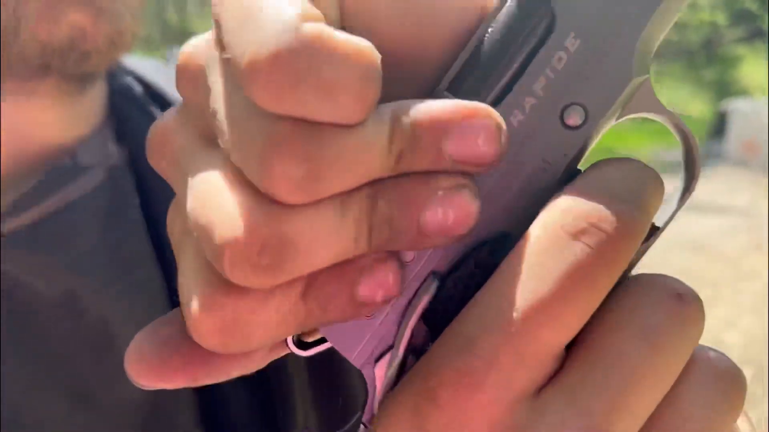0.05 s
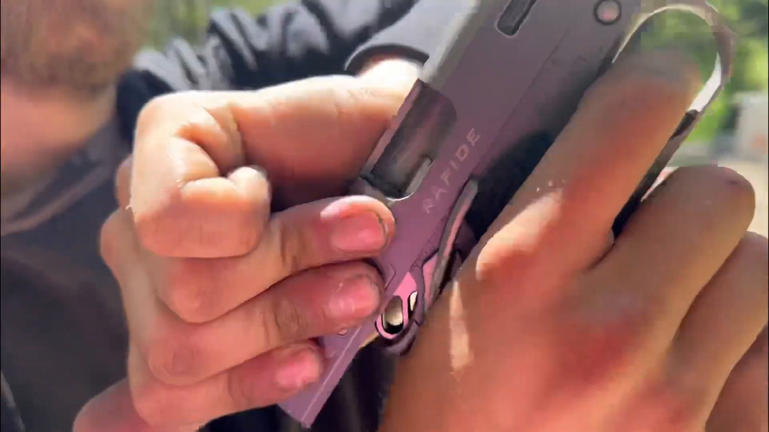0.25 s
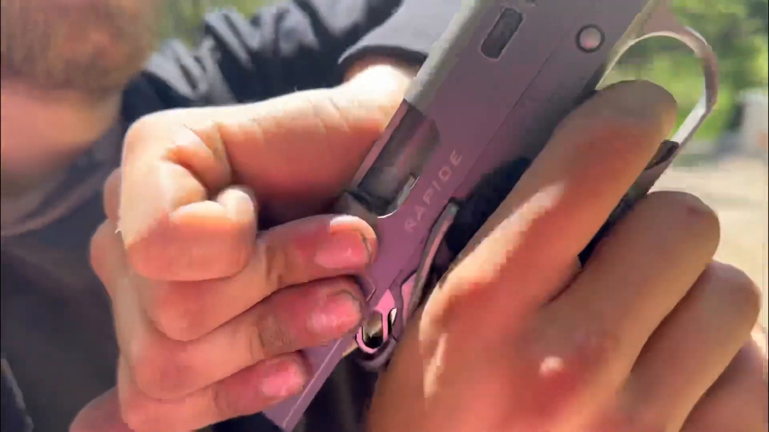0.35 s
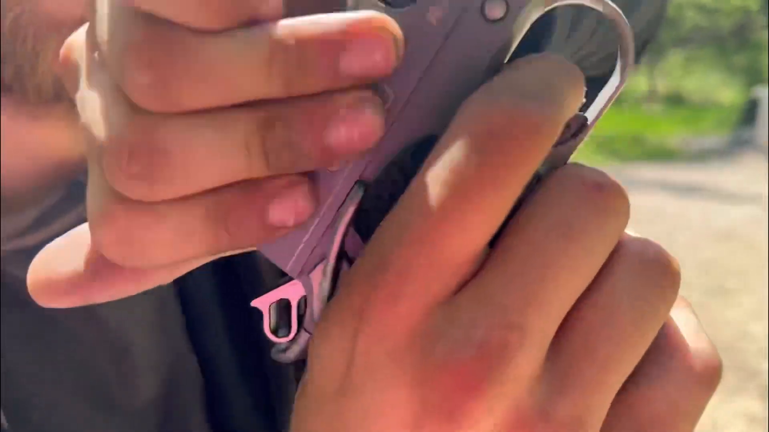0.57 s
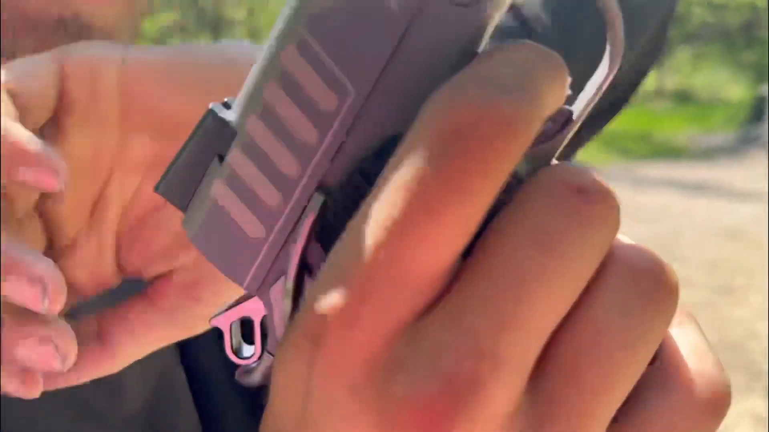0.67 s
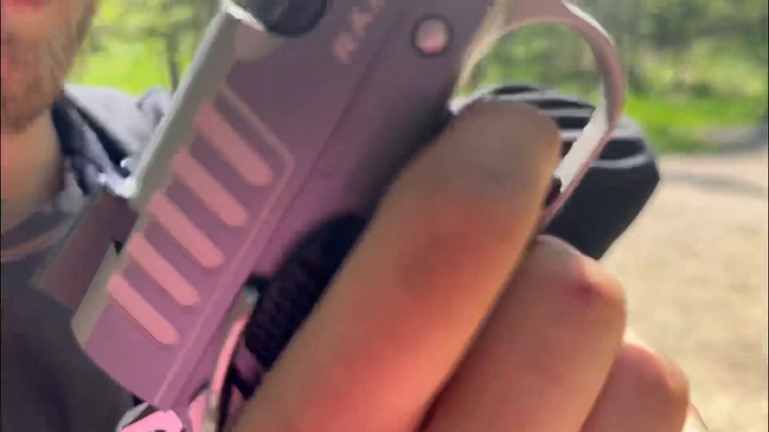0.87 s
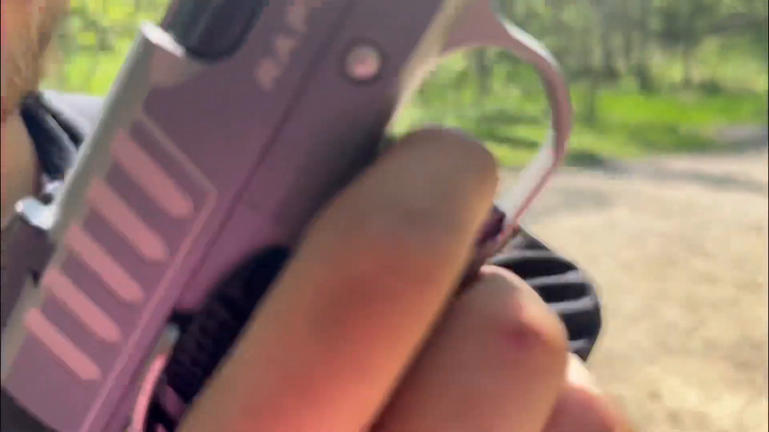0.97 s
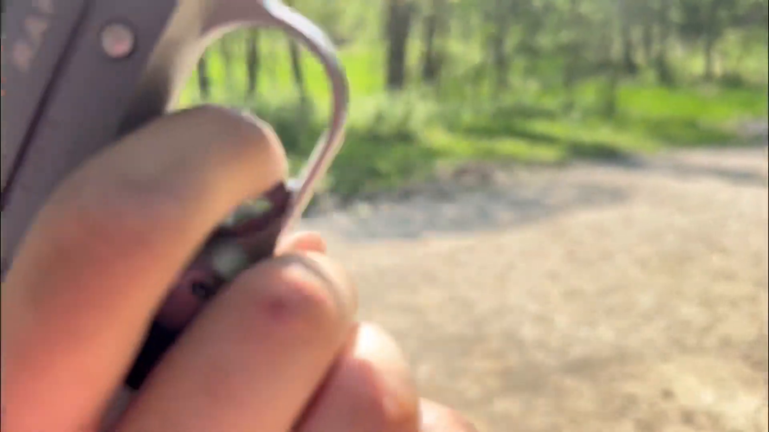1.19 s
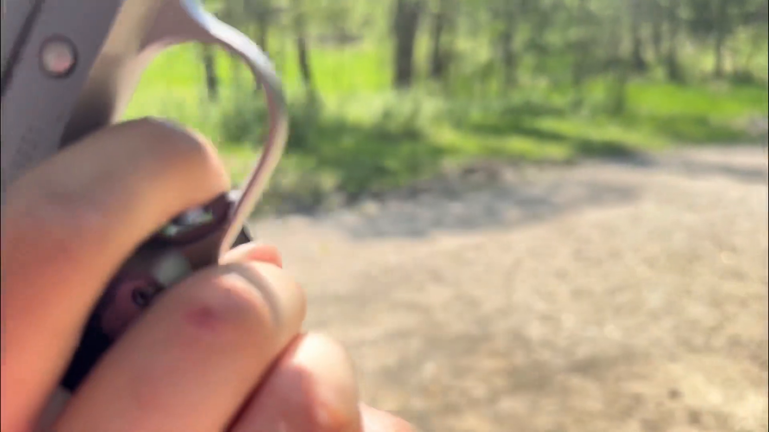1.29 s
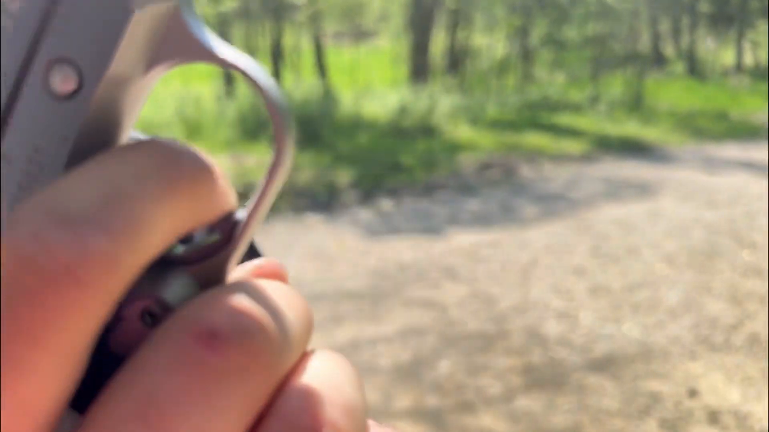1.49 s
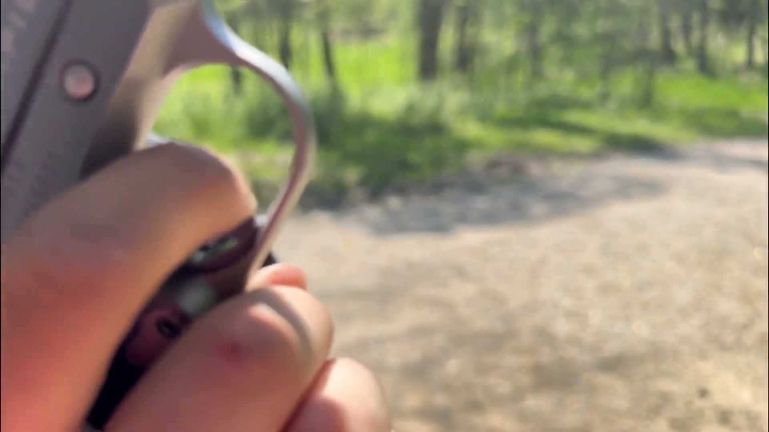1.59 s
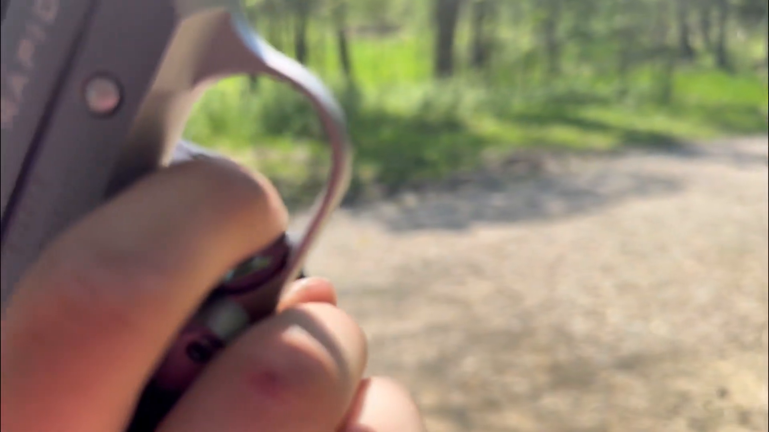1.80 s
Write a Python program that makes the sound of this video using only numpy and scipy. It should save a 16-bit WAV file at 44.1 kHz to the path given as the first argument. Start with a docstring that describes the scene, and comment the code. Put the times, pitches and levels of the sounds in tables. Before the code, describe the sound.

A pistol is racked close to the microphone: the hammer clicks back, the slide scrapes open with a thump, then rides forward and snaps shut. Hands shift softly on the grip over faint outdoor air and distant birds.

```python
"""Racking a pistol slide

An unloaded steel pistol is worked by hand close to the microphone, outdoors: the hammer clicks back,
the slide scrapes to its rear stop with a thump, rides forward and snaps shut.
Then the hands shift on the grip, over faint air and distant birds."""
import sys
import numpy as np
from scipy import signal
from scipy.fft import rfft, irfft, next_fast_len
from scipy.io import wavfile
from scipy.ndimage import map_coordinates

SR = 44100
rng = np.random.default_rng(int(sys.argv[2]) if len(sys.argv) > 2 else 0)


def dump_mix(stems):
    """Bounce the given channels to the path in sys.argv[1] as a 16-bit WAV at rate SR."""
    frames = np.atleast_2d(stems).T  # one column per channel
    limited = np.clip(frames, -1, 1)  # hard clip at full scale
    pcm = np.round(limited * 32767).astype(np.int16)
    wavfile.write(sys.argv[1], SR, pcm)


N = 81585
TOP_HZ = 16500

# colour of the pistol's steel: f/Hz, level/dB
STEEL_COLOUR = [(150, -48), (550, -28.5), (800, -19), (1050, -8.5), (1400, -8), (1800, -6), (2500, -11),
                (3600, -4.5), (5000, -9), (6000, -13), (7500, -9.5), (9200, -4.5), (11000, -13),
                (13500, -19.5), (15200, -20), (17000, -31.5)]
# echo decay among the trees: f/Hz, t60/s
WOODS_DECAY = [(200, 0.27), (3000, 1.1), (9000, 0.24), (15000, .5)]


def amp(db):
    """Decibels to gain."""
    return 10 ** (np.asarray(db) / 20)


def unit(x):
    """Scale to rms 1."""
    return x / np.sqrt(np.mean(x ** 2) + 1e-20)


def along(points, hz):
    """Interpolate (f/Hz, value) points on a log axis."""
    point_hz, values = np.transpose(points)
    return np.interp(np.log(hz + 1), np.log(point_hz + 1), values)


def clock():
    """Sample times in s."""
    return np.arange(N) / SR


def wobble(knots_per_s):
    """Smooth random curve."""
    knots = rng.standard_normal(int(N * knots_per_s / SR) + 4)
    return map_coordinates(knots, [clock() * knots_per_s])


def filtered(x, response):
    """Apply a complex frequency response."""
    size = next_fast_len(N + SR // 4)
    return irfft(rfft(x, size) * response(np.fft.rfftfreq(size, 1 / SR)), size)[..., :N]


def burst(t60_s, rise_s=0.0004):
    """Decaying noise of energy 1."""
    t = np.arange(SR // 10) / SR
    x = rng.standard_normal(len(t)) * amp(-60 * t / t60_s) * (1 - np.exp(-t / rise_s))
    return x / np.linalg.norm(x)


def add(out, at_s, x, response, size=16384):
    """Colour the short sound x and mix it into out."""
    lead = size // 4
    start = round(at_s * SR) - lead
    spectrum = rfft(np.pad(x, (lead, 0)), size)
    coloured = irfft(spectrum * response(np.fft.rfftfreq(size, 1 / SR) + 1))
    a, b = max(start, 0), min(start + size, N)
    out[a:b] += coloured[a - start:b - start]


def stereo(mid, side):
    """Mid and side to left and right."""
    return np.array([mid + side, mid - side])


def ring(at_s, modes, rise_s=0.0007):
    """Damped modes after a blow."""
    t = np.maximum(clock() - at_s, 0)
    tones = sum(amp(db - 60 * t / t60_s) * np.sin(2 * np.pi * hz * t) for hz, db, t60_s in modes)
    return (1 - np.exp(-t / rise_s)) * tones


def glides(rows, waver):
    """Unsteady tones that glide and settle on a note."""
    out = np.zeros(N)
    for at_s, length_s, start_hz, end_hz, db in rows:
        progress = np.clip((clock() - at_s) / length_s, 0, 1)
        hz = (end_hz + (start_hz - end_hz) * (1 - progress) ** 2) * (1 + waver * wobble(200))
        arch = 2 * np.sqrt(progress * (1 - progress))
        out += amp(db) * arch * np.sin(2 * np.pi * np.cumsum(hz) / SR)
    return out


def noise(colour, levels, width, waver_db):
    """Stereo noise wavering about a level curve."""
    mid, side = unit(filtered(rng.standard_normal((2, N)), lambda hz: amp(along(colour, hz))))
    gain = amp(np.interp(clock(), *np.transpose(levels)) + waver_db * wobble(8.4))
    return gain * stereo(mid, width * side)


def echo(x, decay, width=0.72):
    """Diffuse stereo tail; each frequency dies at its own rate."""
    hz, t, spectra = signal.stft(rng.standard_normal((2, SR)), SR, nperseg=256)
    fade = amp(-60 * t / along(decay, hz)[:, None])
    _, tail = signal.istft(spectra * fade, SR, nperseg=256)
    mid, side = signal.fftconvolve(x[None], tail / np.linalg.norm(tail[0]), axes=1)[:, :N]
    return stereo(mid, width * side)


def air():
    """Faint, wide outdoor hush."""
    colour = [(59, -30), (100, 0), (502, -4.5), (854, -14), (1360, -12.5), (1800, -17.5), (2420, -18.5),
              (3860, -25.5), (4770, -23), (7610, -33.5), (10000, -36), (14700, -41), (16000, -53)]  # f/Hz, level/dB
    levels = [(0, -72.5), (.5, -69), (.8, -66.5), (1.05, -65.5), (1.42, -66), (1.6, -68), (1.85, -72)]  # t/s, level/dB
    return noise(colour, levels, width=0.78, waver_db=-2)


def birds():
    """Far whistles echoing in the trees."""
    whistles = [(1.09, 0.045, 1410, 1420, -70.5), (1.203, 0.059, 6490, 6850, -74.5),
                (1.281, 0.052, 7800, 5150, -69), (1.466, 0.029, 6430, 5100, -77),
                (1.53, .05, 4200, 4420, -71.5), (1.591, .085, 4578, 4650, -67),
                (1.701, 0.051, 4746, 4620, -75.5), (1.78, 0.069, 3376, 3100, -77.5),
                (1.795, .06, 5250, 5180, -74.5), (1.808, 0.065, 5972, 6300, -68.5)]  # t/s, length/s, start f/Hz, end f/Hz, level/dB
    song = glides(whistles, waver=0.006)
    return song + echo(song, WOODS_DECAY)


def handling_rumble():
    """Deep, nearly centred noise from the hands."""
    colour = [(20, -21), (35, -5.5), (60, 9), (90, 1), (140, -8), (300, -40)]  # f/Hz, level/dB
    levels = [(0, -68), (.6, -64), (0.921, -67), (1.5, -69), (1.85, -65.5)]  # t/s, level/dB
    return noise(colour, levels, width=0.12, waver_db=4)


def surroundings(gun):
    """Reflections of the pistol: a short echo and a longer one from the trees."""
    colour = [(100, -22.5), (1000, -28), (2500, -16), (5000, -20), (9000, -25), (15000, -23.5)]  # f/Hz, gain/dB
    short_decay = [(150, .2), (1000, 0.42), (3000, 0.12), (9000, 0.33), (15000, 0.071)]  # f/Hz, t60/s
    sent = filtered(gun, lambda hz: amp(along(colour, hz)))
    return echo(sent, short_decay) + amp(-10) * echo(sent, WOODS_DECAY)


def skin_squeaks():
    """Skin squeaks on the grip in short, unsteady tones."""
    squeaks = [(.865, 0.022, 1400, 900, -59), (1.358, 0.044, 1841, 1863, -56.5),
               (1.415, 0.0343, 1445, 747, -59)]  # t/s, length/s, start f/Hz, end f/Hz, level/dB
    return glides(squeaks, waver=0.0428)


def soft_knocks():
    """Soft knocks, each with a brighter tick: mostly the hands knocking and rubbing on the grip, but at 0.2615
    s and 0.479 s the mid-band body of the slide's thumps at its rear stop and as it shuts."""
    taps = [(.1262, -24.5, 480, 0.016, -41.5), (.1778, -18, 490, 0.014, -43.5),
            (.2615, 1.5, 580, 0.015, -30.5), (.3700, -37.5, 715, .012, -28.5),
            (.4790, 0, 600, 0.011, -32.5), (.5950, -22.5, 1197, 0.01174, -31.5),
            (0.6502, -11.5, 950, 0.012, -46.5), (0.66, -18, 1200, 0.013, -45),
            (0.6778, -21.5, 1152, 0.0073, -48.5), (1.015, -15.5, 447, 0.023, -32.5),
            (1.076, -18, 413.5, .03, -32), (1.2184, -14, 456, 0.014, -27), (1.2790, -15.5, 550, 0.028, -28),
            (1.3235, -16.5, 943, 0.0066, -60), (1.362, -10.5, 461, 0.085, -23.5),
            (1.3810, -26.5, 1786, 0.042, -27), (1.388, -14, 595, 0.035, -23),
            (1.4390, -19.5, 700.5, 0.066, -31.5), (1.7336, -29.5, 603, 0.0068, -33.5)]  # t/s, knock level/dB, centre f/Hz, t60/s, tick level/dB
    skin_colour = [(200, -6.5), (2000, 1), (3600, -8), (5500, -5.5), (9000, -16.5), (15000, -27.5)]  # f/Hz, level/dB
    q = 2
    out = np.zeros(N)
    for at_s, knock_db, centre_hz, t60_s, tick_db in taps:
        add(out, at_s, burst(t60_s), lambda hz: amp(knock_db) / (1 + (q * np.log(hz / centre_hz)) ** 4))
        add(out, at_s, burst(t60_s), lambda hz: amp(tick_db + along(skin_colour, hz)))
    return out


def thumps():
    """Dull jolts through the hands, each leaving a faint deep boom."""
    jolts = [(0.243, 7.5, 152.7), (0.262, 19, 287.6), (0.264, 28.5, 115), (.3040, 9, 260),
             (0.41, -3, 264.6), (.4370, -0.5, 278), (.4785, 1.5, 450), (0.501, -5.5, 202), (1.159, 9.5, 65),
             (1.726, 4, 55)]  # t/s, level/dB, low-pass f/Hz
    low_cut_hz = 51
    boom_hz, boom_gain_db, boom_t60_s = 43.56, -70.5, 1.0
    out = np.zeros(N)
    for at_s, db, corner_hz in jolts:
        band = lambda hz: 1 / np.sqrt((1 + (hz / corner_hz) ** 6) * (1 + (low_cut_hz / hz) ** 4))
        add(out, at_s, [amp(db)], band)
        out += ring(at_s, [(boom_hz, db + boom_gain_db, boom_t60_s)])
    return out


def slide_scrape():
    """The slide grates along its rails; close steel resonances ripple the spectrum."""
    strokes = [(0.194, 0.202, -53.5, -50.5, -1.5), (0.236, 0.242, -36.5, -32.5, -0.5),
               (0.239, 0.259, -28.5, -27, 5), (.392, .410, -56, -48.5, 2.5),
               (0.405, 0.435, -44.5, -40.5, 0.5), (0.442, 0.482, -35.5, -34, -1)]  # start t/s, end t/s, start level/dB, end level/dB, tilt/(dB/octave)
    rough_db, fade_s = 2, 0.0018
    ripple_db, ripple_step_hz = 5, 70.87
    out, t = np.zeros(N), clock()
    for start_s, end_s, start_db, end_db, tilt in strokes:
        colour = lambda hz: amp(along(STEEL_COLOUR, hz) + tilt * np.log2((hz + 1) / 4000))
        grit = rng.standard_normal(N) * amp(rough_db * wobble(640))
        gate = np.clip(np.minimum(t - start_s, end_s - t) / fade_s + 0.5, 0, 1)
        gain = amp(np.interp(t, [start_s, end_s], [start_db, end_db]))
        out += unit(filtered(grit, colour)) * gate * gain
    knots = rng.standard_normal(2000)
    ripple = lambda hz: map_coordinates(knots, [hz / ripple_step_hz], mode="wrap")
    return filtered(out, lambda hz: unit(amp(ripple_db * ripple(hz))))


def steel_ring():
    """Steel rings on as the hammer is pushed back and the slide hits each stop."""
    hammer_modes = [(935, -22.5, 0.015), (1087, -22, .02), (1690, -28, .02), (3260, -26, .014),
                    (3950, -25.5, 0.01), (4680, -26.5, .014), (7900, -27, 0.012)]  # f/Hz, level/dB, t60/s
    hammer_blows = [(.2076, 3), (0.2226, -4)]  # t/s, gain/dB
    open_modes = [(1130, -36.5, .05), (1992, -34, .09), (2902, -42.5, .15), (3790, -29, 0.033),
                  (5170, -36, .15), (7278, -43, .13), (9500, -36, .1), (10437, -42, .1)]  # slide held open: f/Hz, level/dB, t60/s
    shut_modes = [(2084, -20.5, 0.032), (2300, -38.5, 0.053), (2430, -33, 0.08), (2682, -32, .06),
                  (3310, -33, 0.041), (4770, -56.5, 0.14), (7806, -48.5, .12)]  # action closed: f/Hz, level/dB, t60/s
    open_s, shut_s, low_cut_hz = 0.2612, 0.4788, 700
    hammer = sum(amp(db) * ring(at_s, hammer_modes) for at_s, db in hammer_blows)
    slide = ring(open_s, open_modes) + ring(shut_s, shut_modes)
    return signal.sosfilt(signal.butter(6, low_cut_hz, "high", fs=SR, output="sos"), hammer + slide)


def steel_clicks(width=0.55):
    """Mid and side: sharp strikes, smeared by the steel, with chatter unlike at the two mic ports."""
    contacts = [(0.1029, -26.5, -30, -37, -22, 0.013), (.1180, -17, -21, -27, -16, 0.017),
                (0.126, -16.5, -28, -32.5, -13.5, 0.011), (0.1712, -19, -16, -17, -14.5, 0.018),
                (0.1769, -4, -16, -19, -8.5, 0.039), (0.2069, 10.5, 13, 20, 24.5, 0.0058),
                (0.2181, 5, 17, 9.5, 15.5, 0.025), (0.2216, 12, 16, 16, 16.5, .007),
                (0.2445, 1.5, 10.5, 3.5, 14, 0.022), (0.2432, 3.5, 8, 4, 8.5, 0.027),
                (0.2612, 20, 13.5, 16, 20.5, 0.0086), (0.2623, -16, 21, 9, 10.5, 0.013),
                (.2740, -8.5, 7, 1.5, 3, 0.05), (0.2848, -1.5, 0.5, -3, 3, .015),
                (0.4, -24, -24, -12, -4, 0.008), (0.4107, -13.5, -13, -5.5, -0.5, .012),
                (.4380, 1.5, -2.5, 7, 13, 0.0051), (0.4485, -3.5, -16, 11.5, 17.5, 0.0082),
                (.4580, -15, -5.5, 2.5, 3.5, 0.0074), (0.4661, 3.5, 8.5, 18.5, 16, 0.0082),
                (0.4781, 10, 17, 15.5, 13.5, .007), (0.608, -26, -35.5, -23.5, -23.5, .02),
                (0.6244, -13.5, -29, -27.5, -16, 0.012)]  # t/s, level/dB at each of bands_hz, chatter t60/s
    bands_hz = [1000, 4000, 9000, 14000]  # f/Hz
    strike_db, chatter_db, spread_s = -3.5, -2, 0.00025
    mid, side = np.zeros((2, N))
    for at_s, *band_db, t60_s in contacts:
        bands = list(zip(bands_hz, band_db))
        colour = lambda hz: amp(along(STEEL_COLOUR, hz) + along(bands, hz))
        delays_s = spread_s * rng.standard_normal(16)
        group_delay_s = lambda hz: np.interp(hz, np.linspace(0, TOP_HZ, len(delays_s)), delays_s)
        smear = lambda hz: np.exp(-2j * np.pi * np.cumsum(group_delay_s(hz)) * (hz[1] - hz[0]))
        add(mid, at_s, [amp(strike_db)], lambda hz: colour(hz) * smear(hz))
        add(mid, at_s, amp(chatter_db) * burst(t60_s), colour)
        add(side, at_s, width * amp(chatter_db) * burst(t60_s), colour)
    return mid, side


def mic_ports(x):
    """Level and phase between the two ports place the sound slightly left."""
    balance = [(100, 1), (280, 1), (600, 2.5), (1100, 4), (2200, -0.5), (3500, 1.5), (5500, 8.5), (7500, 4),
               (9200, -0.5), (15000, 2.5)]  # f/Hz, left minus right/dB
    phase = [(120, 0), (300, .2), (860, 1.1), (1640, 1), (2200, 1.5), (4000, 1.65), (8100, 1.7),
             (10700, .6), (13600, -.8), (16000, -1.4)]  # f/Hz, left lead/rad
    half = np.array([[0.5], [-0.5]])
    return filtered(x, lambda hz: amp(half * along(balance, hz)) * np.exp(1j * half * along(phase, hz)))


def scene():
    """The pistol, its echoes and the quiet outdoors."""
    click_mid, click_side = steel_clicks()
    gun = click_mid + steel_ring() + slide_scrape() + soft_knocks() + skin_squeaks()
    near = stereo(gun, click_side) + thumps() + surroundings(gun)
    return mic_ports(near) + birds() + air() + handling_rumble()


def record(dry):
    """The band-limited microphone passes low tones late, so knocks sweep downward."""
    lag_cycles = 1.3
    return filtered(dry, lambda hz: (hz < TOP_HZ) * np.exp(-2j * np.pi * lag_cycles * np.log(hz + 10)))


dry = scene()
out = record(dry)
dump_mix(out)
```